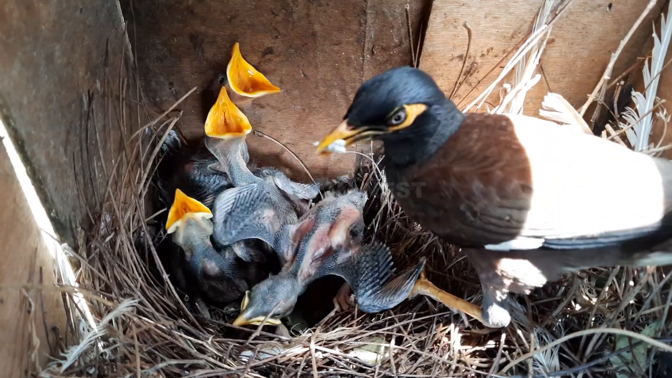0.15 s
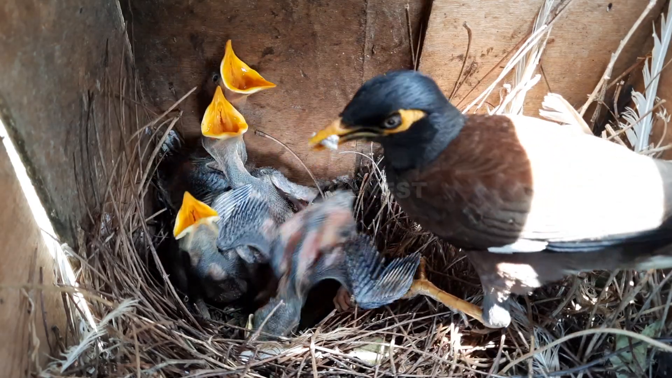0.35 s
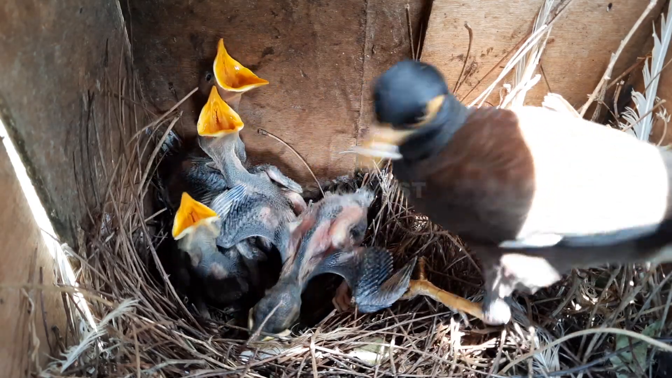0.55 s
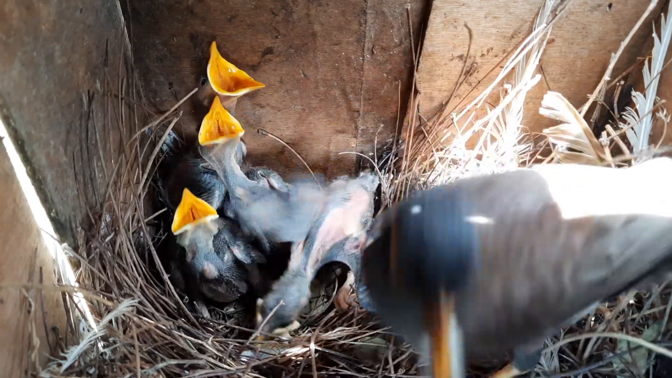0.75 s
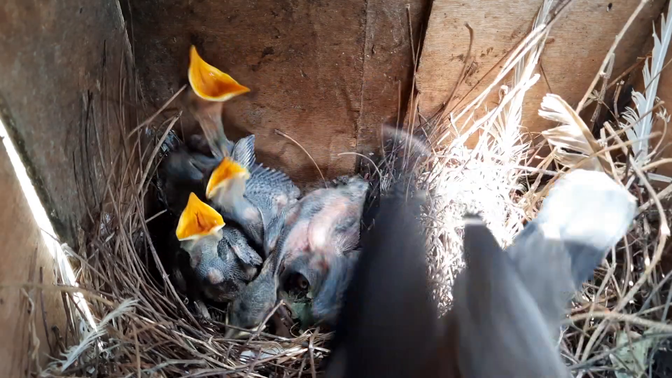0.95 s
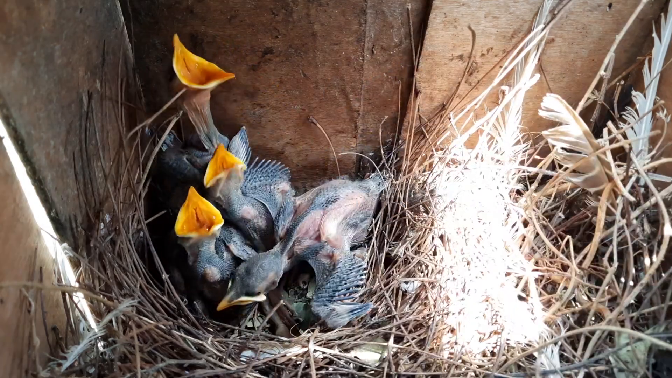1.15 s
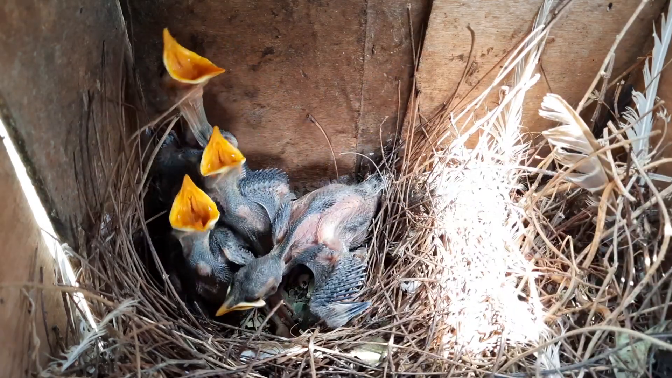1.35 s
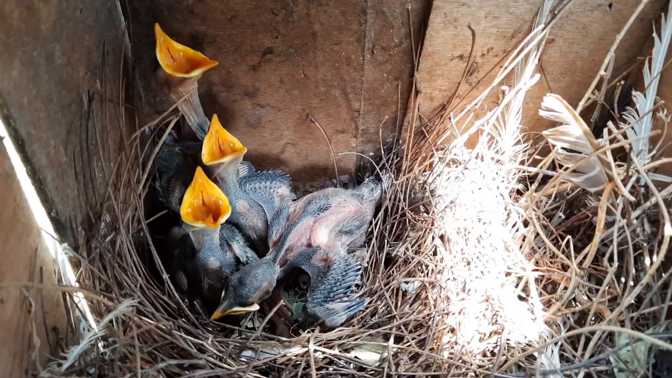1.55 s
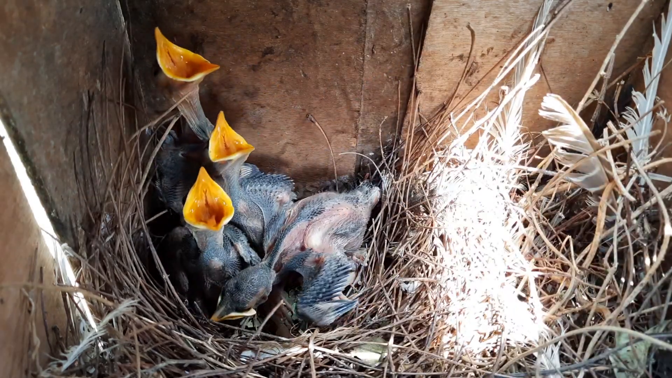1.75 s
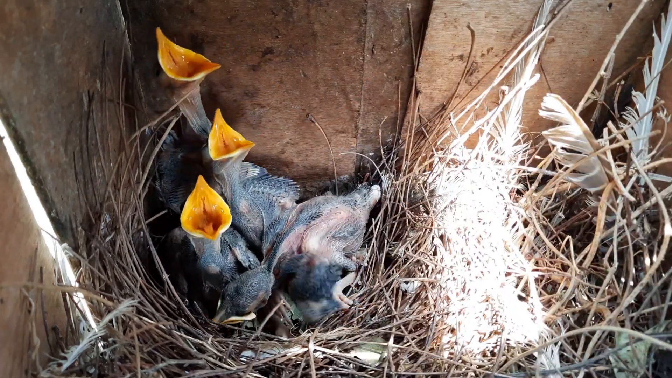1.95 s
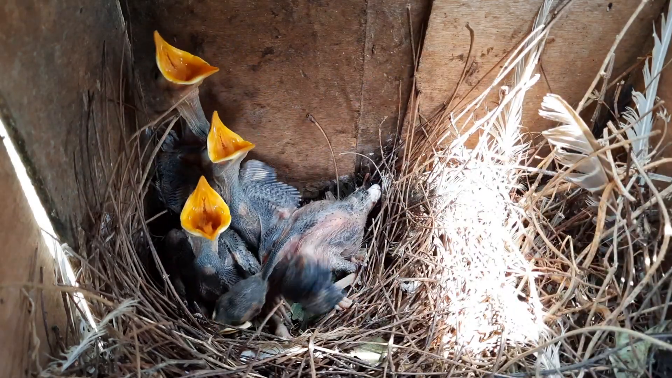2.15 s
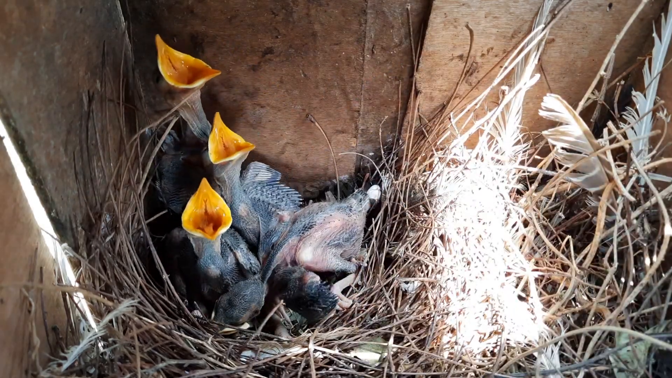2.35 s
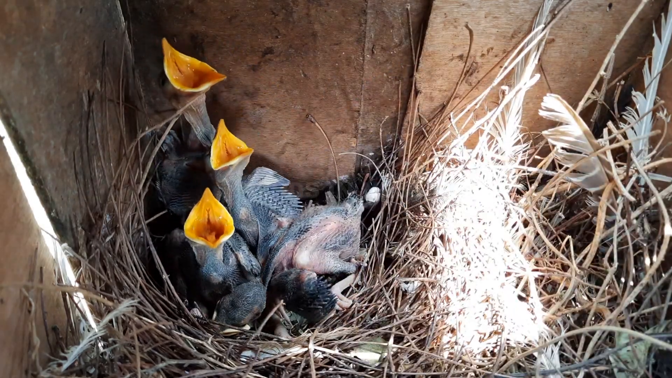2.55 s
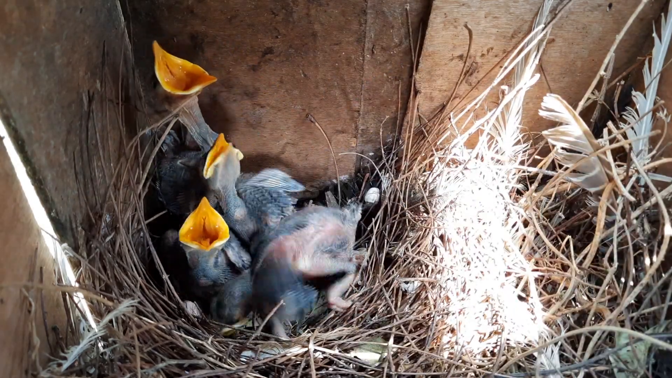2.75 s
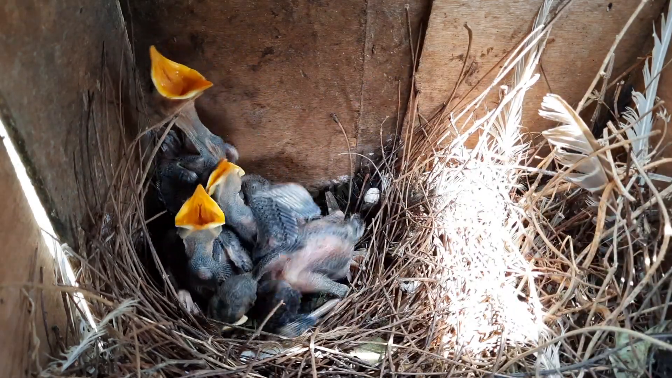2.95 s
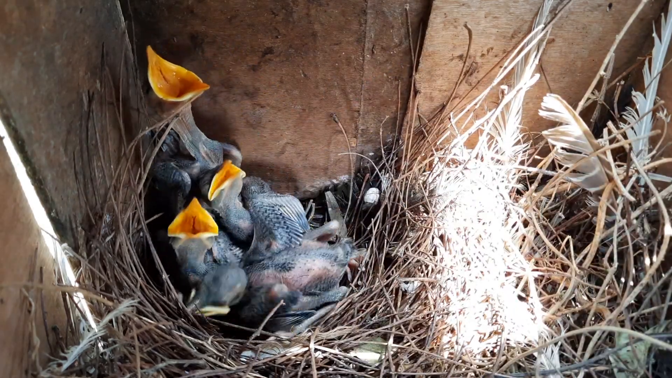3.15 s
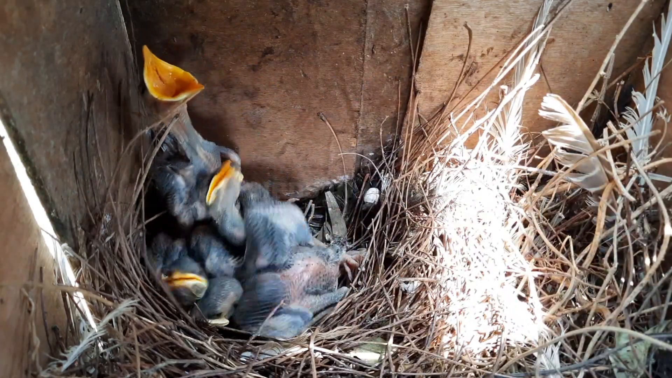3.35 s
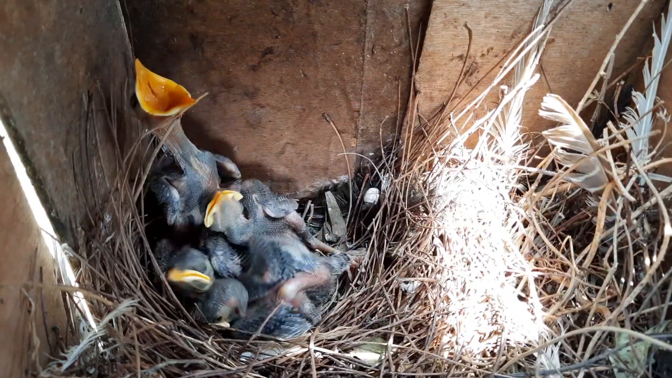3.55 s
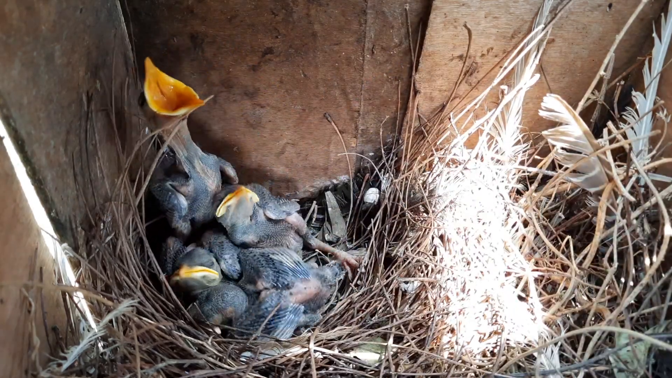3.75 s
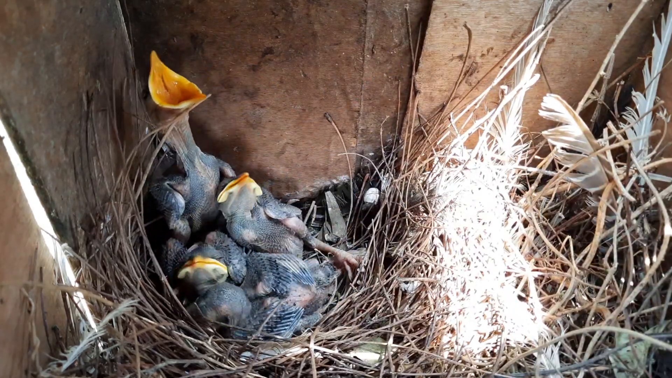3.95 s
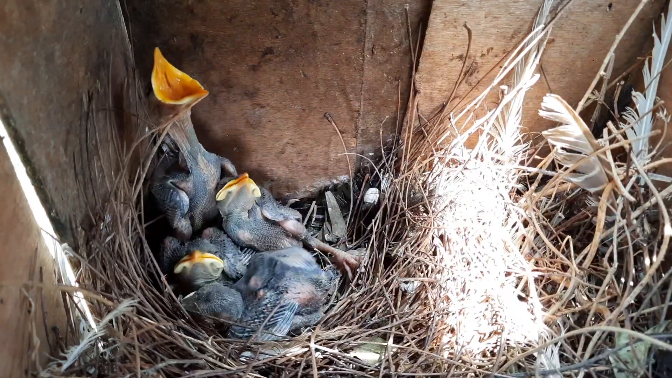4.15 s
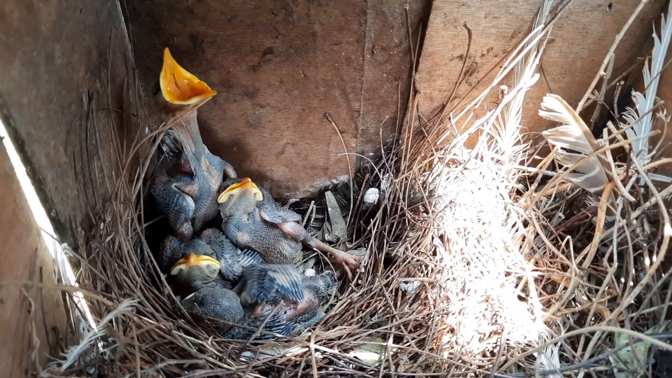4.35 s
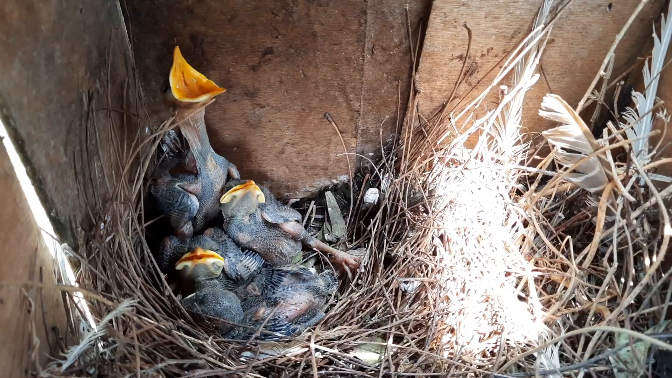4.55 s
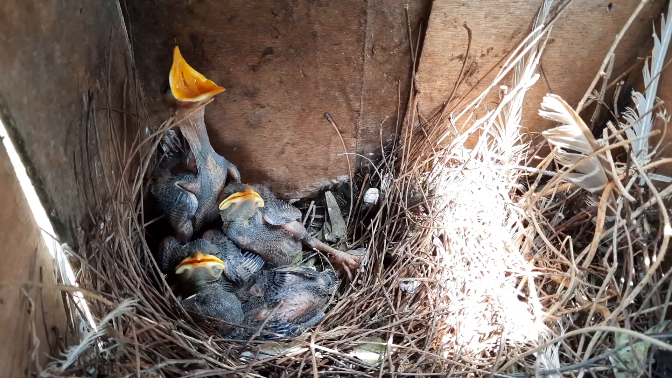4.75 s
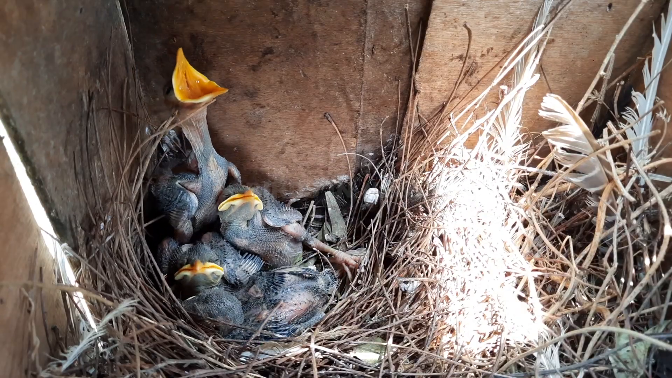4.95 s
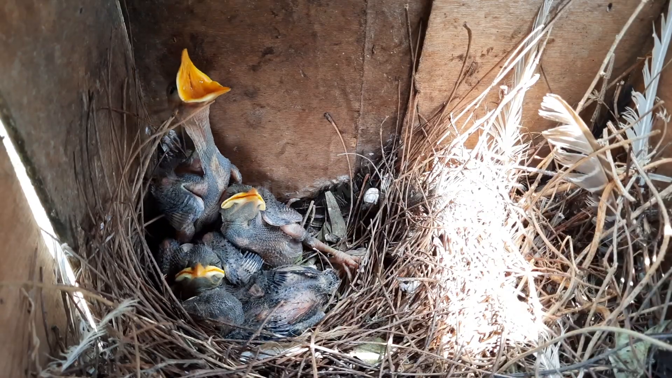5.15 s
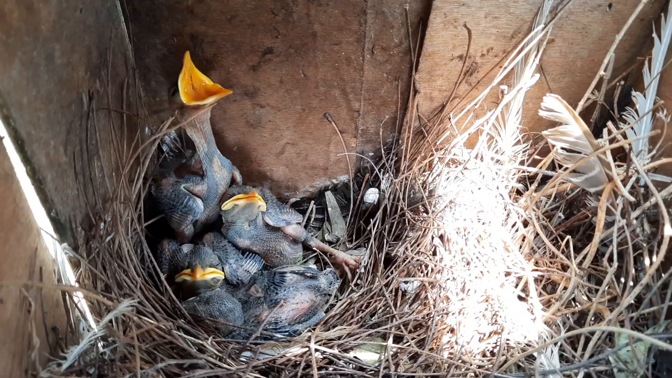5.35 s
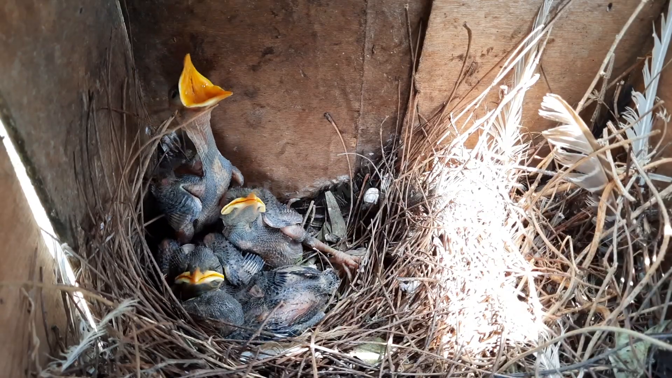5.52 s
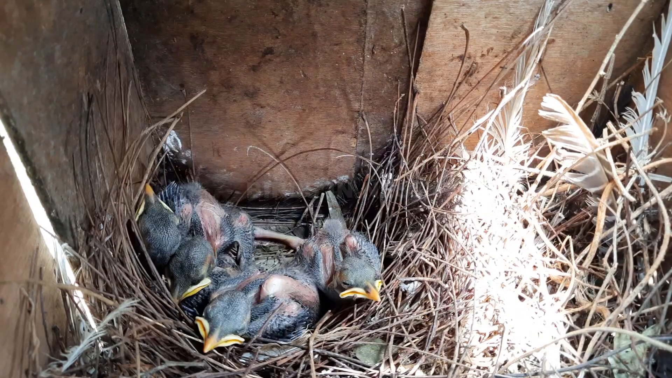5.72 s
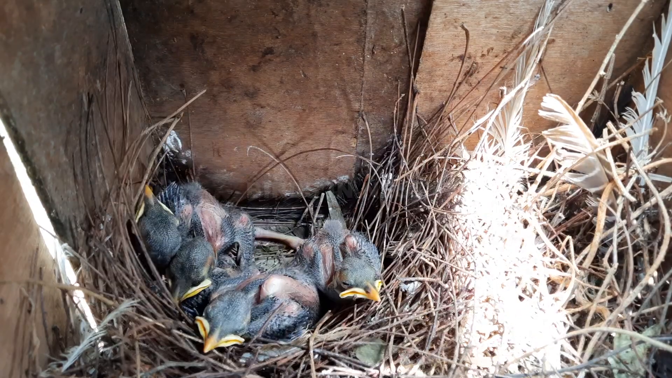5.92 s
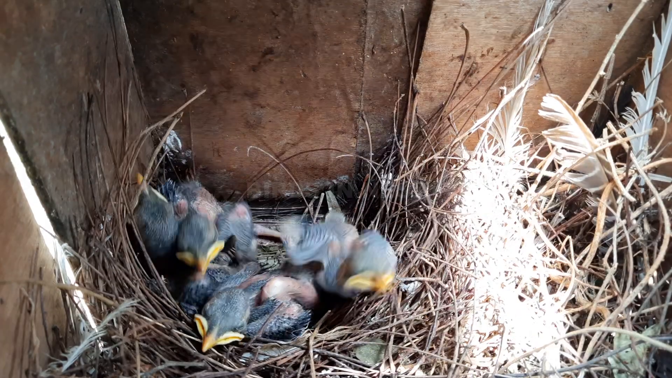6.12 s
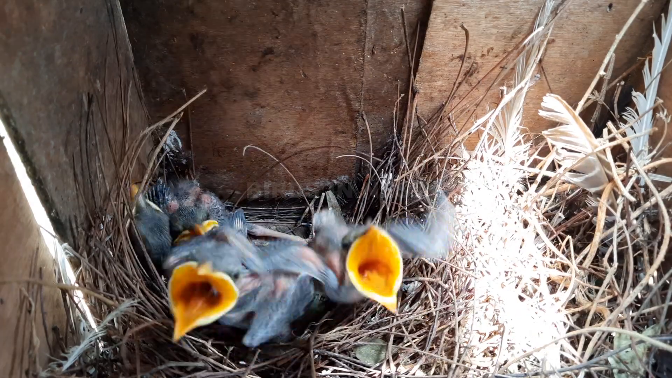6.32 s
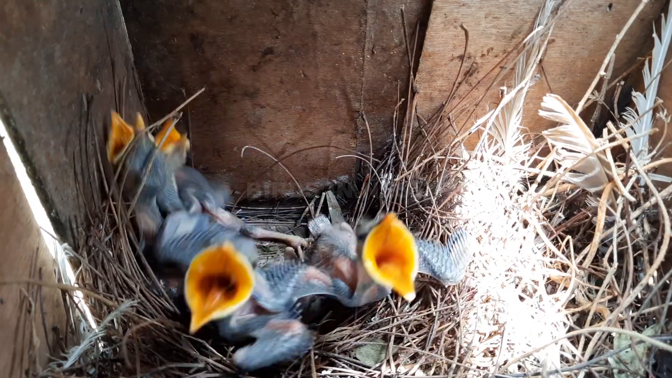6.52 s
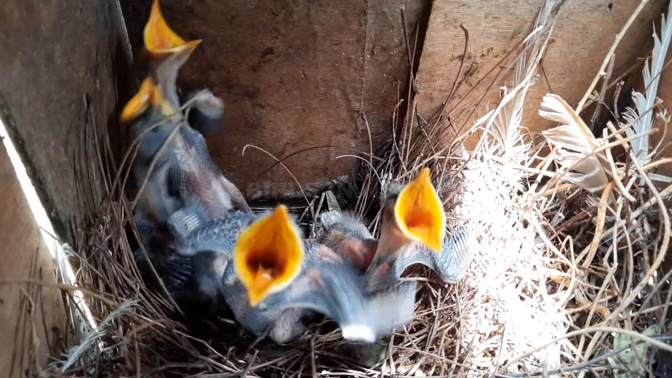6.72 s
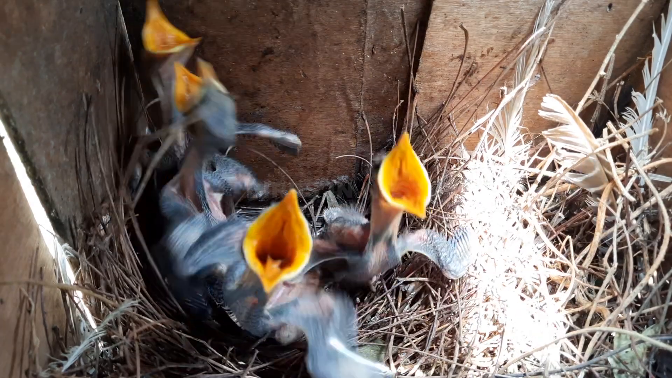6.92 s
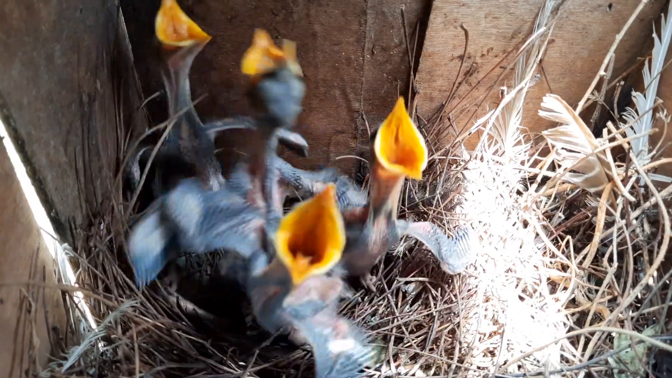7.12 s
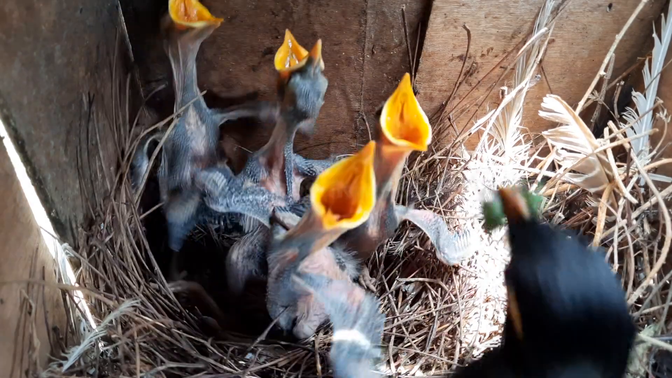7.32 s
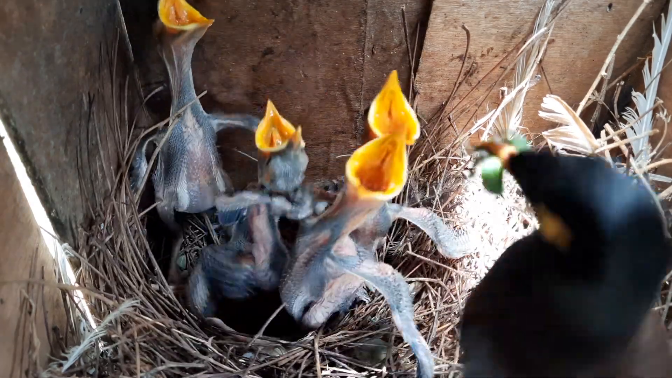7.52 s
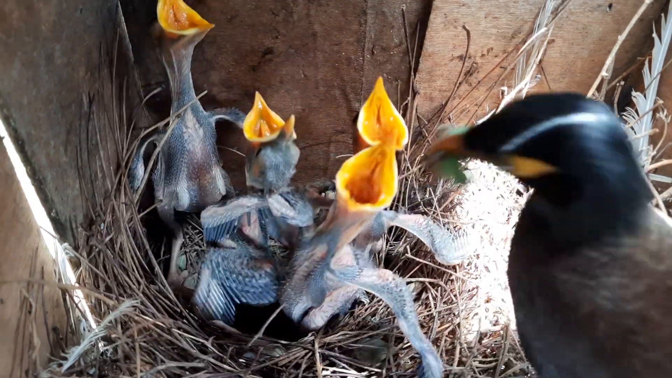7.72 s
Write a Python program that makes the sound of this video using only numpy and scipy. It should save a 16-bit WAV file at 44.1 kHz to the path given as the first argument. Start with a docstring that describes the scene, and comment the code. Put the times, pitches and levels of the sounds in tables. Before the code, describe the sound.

Heard from close up in a wooden nest box, a nestling calls in quick, high, warbling bursts with a harsh edge, and weaker chicks squeak around it. A few soft thumps of an adult bird hopping come early. The cries break off briefly past the middle, then return with more thumps, rustling twigs and small dry snaps. Far outside, insects hiss faintly and steadily.

```python
"""Nestlings begging in a wooden nest box

A small stereo microphone sits close to the brood. The loudest chick whistles a warbling cry that throbs
about ten times a second and turns harsh as a second, lower voice joins each throb; its nest mates add
short slides and peeps. The parent's hops thud on the boards, bodies shuffle in the twigs, a draught
brushes the microphone, and far outside an insect chorus hisses through the pauses."""
import sys
import numpy as np
from scipy import signal
from scipy.fft import rfft, irfft, next_fast_len
from scipy.io import wavfile
from scipy.ndimage import uniform_filter1d, map_coordinates

SR = 44100
rng = np.random.default_rng(int(sys.argv[2]) if len(sys.argv) > 2 else 0)


def put_to_file(sound):
    """Save the sound as 16-bit audio at rate SR, in the file named by the first command-line argument."""
    columns = np.atleast_2d(sound).T  # one column per channel
    safe = np.clip(columns, -1, 1)
    whole_steps = np.round(safe * 32767)
    wavfile.write(sys.argv[1], SR, whole_steps.astype(np.int16))


N = 347508
TIME = np.arange(N) / SR
SCRAMBLE_S, TURNED_DB = 6.0, -11  # from here the chicks scramble, beaks point away and overtones weaken


def amp(db):
    """Decibels to gain."""
    return 10 ** (np.asarray(db) / 20)


def unit(x):
    """x scaled to rms 1."""
    return x / np.sqrt(np.mean(x ** 2) + 1e-20)


def sides(db):
    """Gains that make the left channel db louder than the right."""
    return amp([[db / 2], [-db / 2]])


def wobble(rate):
    """A smooth random curve of rms 1, with rate knots a second."""
    return unit(map_coordinates(rng.standard_normal(int(N * rate / SR) + 4), [TIME * rate]))


def filtered(x, response):
    """x through a filter whose gain is response(hz)."""
    size = next_fast_len(N + SR // 4)
    return irfft(rfft(x, size) * response(np.fft.rfftfreq(size, 1 / SR)), size)[..., :N]


def rush(spectrum, mono_hz=400, patchy_db=4):
    """Stereo noise of rms 1, alike on both sides below mono_hz, with louder and softer patches."""
    def colour(hz):
        width = np.pi / 4 / (1 + (mono_hz / (hz + 1)) ** 2)
        return amp(np.interp(np.log(hz + 1), np.log(knots_hz), db)) * [np.cos(width), np.sin(width)]

    knots_hz, db = np.transpose(spectrum)
    cells = signal.stft(rng.standard_normal((2, N)), nperseg=256)[2]
    patches = rng.standard_normal(cells.shape[1:])
    patches = unit(uniform_filter1d(uniform_filter1d(patches, 5, axis=0), 7, axis=1))
    noise = signal.istft(cells * amp(patchy_db * patches), nperseg=256)[1][:, :N]
    mid, side = filtered(noise, colour)
    return unit(np.array([mid + side, mid - side]))


# Spectrum of the insects, far outside the box: (frequency [Hz], relative density [dB])
INSECT_SPECTRUM = [(2500, -31.5), (3600, -28.5), (4600, -6), (8300, -7.5), (9600, -28), (15500, -30.5)]


def insects(level_db=-48):
    """A distant chorus merges into one steady, high hiss."""
    return amp(level_db) * rush(INSECT_SPECTRUM, patchy_db=4.5)


def draught(level_db=-60):
    """Moving air buffets the microphone, mostly its right port, with a faint rumble."""
    gusts = amp(level_db + 2.5 * wobble(4))
    return gusts * sides(-13) * rush([(25, -26), (65, 0), (200, -30), (900, -90)], mono_hz=1)


# Spectrum of the nest rustling beside the microphone: (frequency [Hz], relative density [dB])
TWIG_SPECTRUM = [(60, -22.5), (110, 0.5), (200, -1), (400, -14.5), (1500, -15.5), (5000, -32.5),
                 (16000, -24.5)]


def twig_shuffle(still_db=-68, begging_db=10, stirred_db=-36, settle_s=0.15, scramble_db=-44):
    """Bodies shift in the twigs while the chick begs, after each hop and in the late scramble."""
    begging = uniform_filter1d(effort()[2], int(.08 * SR))
    stirred = sum(amp(db / 3 + stirred_db) * (TIME > s) * np.exp(-np.abs(TIME - s) / settle_s)
                  for s, db in HOPS)
    scramble = amp(scramble_db) * (TIME > SCRAMBLE_S)
    rustle = unit(amp(3 * wobble(25) + 3 * wobble(250)) * rush(TWIG_SPECTRUM))
    return (amp(still_db + begging_db * begging) + stirred + scramble) * rustle


# Short dry clicks: twig snaps close by, and one faint plain click at 5.58 s:
# (time [s], relative level [dB])
CLICKS = [(0.9964, -14.5), (5.5819, -27.5), (6.043, -23.5), (7.2025, -13.5), (7.352, -14)]


def dry_clicks(attack_s=0.00036, t60=0.057):
    """Each click is a fast-dying noise burst, strongest between 600 and 5000 Hz."""
    out, t = np.zeros((2, N + SR)), np.arange(SR // 20) / SR
    for s, db in CLICKS:
        envelope = amp(db - 60 * t / t60) * (1 - np.exp(-t / attack_s))
        out[:, round(s * SR):][:, :len(t)] += envelope * rng.standard_normal((2, len(t)))
    return filtered(out[:, :N], lambda hz: 1j * hz / (600 + 1j * hz) / (1 + 1j * hz / 5000))


# The parent's hops and bumps, left of the microphone: (time [s], relative level [dB])
HOPS = [(0.925, -17.5), (1.126, -13), (1.237, -14.5), (1.338, -12.5), (5.978, -15), (6.165, -27.5),
        (6.322, -25.5), (6.435, -30), (6.548, -38), (7.106, -24), (7.187, -21), (7.239, -23), (7.36, -28)]
# Modes of the box's boards: (frequency [Hz], relative level [dB])
BOARD_MODES = [(193.5, -1), (230, -4.5), (385, -7.5), (560, -1), (760, -10.5)]


def parent_hops(t60_cycles=10, attack_s=0.0027, scuffle_db=-26.5, scuffle_t60=0.32):
    """Each hop is a soft blow with a scuffle of weaker ones behind it; all ring the boards."""
    out, t = np.zeros((2, N + SR)), np.arange(SR // 4) / SR
    for s, db in HOPS:
        ring = np.zeros(len(t))
        for hz, mode_db in BOARD_MODES:
            decay = amp(mode_db + rng.normal(0, 2.64) - 60 * t * hz / t60_cycles)
            ring += decay * np.sin(2 * np.pi * hz * rng.normal(1, 0.037) * t)
        ring *= 1 - np.exp(-t / attack_s)
        scuffle = amp(scuffle_db - 60 * t / scuffle_t60) * rng.standard_normal(len(t))
        thud = ring + signal.fftconvolve(scuffle, ring)[:len(t)]
        out[:, round(s * SR):][:, :len(t)] += amp(db) * thud
    return sides(10.2) * out[:, :N]


def box_walls(x, wet_db=-13, t60=.03):
    """Close wooden walls add a short, dense tail, different in each channel."""
    t = np.arange(SR // 16) / SR
    tail = rng.standard_normal((2, len(t))) * amp(-60 * t / t60) * (t > .0008)
    tail = amp(wet_db) * tail / np.linalg.norm(tail, axis=1, keepdims=True)
    return x + signal.fftconvolve(x, tail, axes=1)[:, :N]


def peeps(centre_hz=5100, below_db=-19, linger_s=.12):
    """A weaker chick joins in around the loud one's cries: short, wandering squeaks with an octave."""
    db, _, crying = effort()
    phase = 2 * np.pi * np.cumsum(centre_hz * (1 + .11 * wobble(25))) / SR
    bursts = np.clip(wobble(30), 0, 1) * uniform_filter1d(crying, int(linger_s * SR)) ** 2
    return amp(below_db + db) * bursts * (np.sin(phase) + .5 * np.sin(2 * phase))


# Slides of the nest mates, around the loud chick:
# (start [s], length [s], relative level [dB], first pitch [Hz], turning pitch [Hz], last pitch [Hz])
SLIDES = [(0.345, 0.079, -30, 6090, 6600, 5440), (0.475, .045, -36, 5300, 5700, 6000),
          (1.076, 0.1, -35, 5430, 5500, 6300), (1.137, 0.07, -25.5, 4880, 4830, 4140),
          (1.777, 0.1, -35.5, 5770, 4840, 6800), (1.887, 0.087, -40.5, 5450, 4130, 4550),
          (2.289, 0.068, -24.5, 4700, 5460, 4080), (2.516, 0.095, -34.5, 5560, 4250, 5930),
          (2.972, 0.15, -37.5, 5500, 4490, 4210), (3.095, 0.088, -38, 5900, 5200, 6240),
          (3.817, 0.081, -45.5, 4600, 5310, 5590), (4.253, 0.056, -38.5, 3300, 3650, 3280),
          (4.307, 0.088, -34.5, 5080, 6040, 5960), (5.069, 0.076, -40, 4030, 4460, 4380),
          (5.163, 0.13, -44.5, 4400, 4550, 4270), (5.173, 0.13, -48.5, 5950, 6050, 5730),
          (6.358, 0.093, -27.5, 6450, 5006, 4780), (6.484, 0.049, -26, 5930, 4740, 4710),
          (6.579, 0.038, -35, 5900, 4840, 4470), (6.771, 0.062, -30, 4210, 4770, 4360),
          (7.301, 0.16, -25.5, 4900, 4750, 5030), (7.374, .037, -27.5, 6550, 6550, 6620),
          (7.436, 0.098, -23.5, 5400, 5930, 6510), (7.527, 0.14, -28, 5080, 5460, 6620),
          (7.605, 0.16, -30.5, 4950, 4750, 5760), (7.782, 0.11, -22, 4880, 5010, 6100)]
# Breath in any chick's open throat, at close range: (frequency [Hz], relative density [dB])
BREATH_SPECTRUM = [(600, -39.5), (1050, -28.5), (1500, -40.5), (2300, -22), (3500, -20.5), (4500, -15),
                   (6500, -22.5), (8500, -9.5), (10000, -31), (13000, -24), (16000, -40)]


def nest_mates(octave_db=-8, breath_db=-13, edge_s=0.0081, turn_share=.4):
    """Thin whistled slides with breath and an octave that the throat damps on high notes, plus peeps."""
    tone, octave, level = np.zeros((3, N))
    shiver_hz = 35 * wobble(350) + 80 * wobble(60)
    for start, length, db, *hz in SLIDES:
        part = slice(round(start * SR), round((start + length) * SR))
        t = TIME[part] - start
        pitch = np.interp(t, [0, turn_share * length, length], hz)
        pitch = uniform_filter1d(pitch, int(edge_s * SR), mode="nearest")
        phase = 2 * np.pi * np.cumsum(pitch + shiver_hz[part]) / SR
        envelope = amp(db) * np.clip(np.minimum(t, length - t) / edge_s, 0, 1) ** 2
        tone[part] += envelope * np.sin(phase)
        octave[part] += envelope * np.sin(2 * phase)
        level[part] += envelope
    octave = filtered(octave, lambda hz: 1 / (1 + (hz / 9500) ** 10))
    voice = np.sqrt(2) * (tone + amp(octave_db + TURNED_DB * (TIME > SCRAMBLE_S)) * octave)
    hoarse = 1 + .4 * np.array([wobble(1200), wobble(1200)])
    flutter = amp(2.8 * wobble(80))
    return flutter * (hoarse * (voice + peeps()) + amp(breath_db) * level * rush(BREATH_SPECTRUM))


# Cries of the loud chick, close to the microphone: (start [s], end [s])
CRY_SPANS = [(0.072, 0.66), (0.782, 1.161), (1.214, 1.75), (1.97, 2.506), (2.66, 3.606), (3.892, 4.271),
             (4.592, 5.067), (5.422, 5.604), (6.345, 6.413), (6.477, 6.607), (6.891, 7.3), (7.463, 7.82)]
# Its throbs of effort; in each the pitch scoops up to a top, then sags:
# (time of top [s], relative level [dB], scoop pitch [Hz], top pitch [Hz], sag pitch [Hz])
CRY_THROBS = [(0.155, -12, 6315, 7120, 6780), (0.265, -14.5, 6320, 6820, 6470),
              (0.343, -12, 6440, 7060, 6550), (0.486, -14.5, 6270, 7000, 5920),
              (0.613, -18, 5840, 6500, 5780), (0.852, -10, 6440, 6950, 6840),
              (0.974, -12.5, 6380, 6630, 5900), (1.078, -9.5, 6520, 6530, 6280),
              (1.296, -18.5, 6680, 7000, 6490), (1.42, -19, 6230, 7210, 6660),
              (1.497, -11, 6610, 7050, 6760), (1.599, -13, 6700, 6870, 6000),
              (1.699, -13.5, 6380, 6720, 5430), (2.029, -14, 6350, 7000, 6600),
              (2.125, -14.5, 6500, 6820, 6500), (2.175, -17.5, 6530, 6965, 6290),
              (2.231, -14, 6300, 6600, 6000), (2.3, -15, 6020, 7100, 6120), (2.424, -18, 5250, 6490, 5660),
              (2.73, -14.5, 6410, 7150, 6730), (2.831, -15, 6590, 6930, 6280),
              (2.937, -11, 6230, 6566, 6220), (3.046, -19.5, 6160, 6690, 6650),
              (3.194, -18, 6290, 6830, 6680), (3.365, -10, 6570, 6940, 6880),
              (3.481, -14, 6400, 6770, 5980), (3.587, -11, 6040, 6420, 5400),
              (3.968, -12.5, 6480, 7050, 6750), (4.079, -12, 6420, 6790, 5990),
              (4.187, -14.5, 6180, 6520, 6150), (4.672, -13, 6370, 6970, 6800),
              (4.776, -14, 6390, 6790, 6180), (4.885, -15, 5920, 6580, 5240),
              (4.989, -20, 4910, 5710, 4220), (5.486, -11, 6410, 6900, 6680),
              (6.399, -15, 6680, 7130, 6250), (6.509, -9.5, 6150, 7040, 5600),
              (6.568, -26.5, 5900, 6930, 6480), (6.959, -8.5, 6650, 7340, 6370),
              (7.061, -13.5, 6920, 7130, 5920), (7.163, -12, 6580, 7140, 5990),
              (7.258, -15, 6540, 7170, 6220), (7.521, -11, 6250, 7430, 6650),
              (7.624, -11.5, 6576, 7170, 6500), (7.72, -9, 6470, 7000, 6440),
              (7.8, -15.5, 6450, 6860, 6640)]


def effort(lead_s=0.01, width_s=0.029, edge_s=0.011):
    """The loud chick's level [dB], its slackness between throbs (0-1) and whether it is crying (0-1)."""
    top_s, db = np.transpose(CRY_THROBS)[:2]
    push_s = top_s - lead_s  # loudest just before the pitch tops out
    nearest = np.rint(np.interp(TIME, push_s, np.arange(len(push_s)))).astype(int)
    slack = 1 - np.exp(-.5 * ((TIME - push_s[nearest]) / width_s) ** 2)
    crying = sum(np.clip(np.minimum(TIME - start, end - TIME) / edge_s, 0, 1) ** 2
                 for start, end in CRY_SPANS)
    return np.interp(TIME, push_s, db), slack, crying


def warble(opening_hz=7340, scoop_s=.035, sag_s=.028, flick_s=.055, flick_hz=531.6, slump_hz=5635,
           close_hz_per_s=15000):
    """Turning points (time [s], pitch [Hz]) of the whistle: each cry drops in, throbs and falls away."""
    points = []
    for start, end in CRY_SPANS:
        throbs = [row for row in CRY_THROBS if start < row[0] < end]
        following = throbs[1:] + [(np.inf, 0, throbs[-1][-1])]
        points.append((start, opening_hz))
        for (s, _, scoop, top, sag), (next_s, _, next_scoop, *_) in zip(throbs, following):
            # the pitch flicks up between throbs, unless it has slumped or the next one comes too soon
            flicks = sag > slump_hz and next_s - s > flick_s + scoop_s
            link_s = min(s + flick_s, (s + sag_s + next_s - scoop_s) / 2)
            link_hz = (sag + next_scoop) / 2 + flick_hz * flicks
            turns = [(s - scoop_s, scoop), (s, top), (s + sag_s, sag), (link_s, link_hz)]
            points += [turn for turn in turns if turn[0] < end]
        last_s, last_hz = points[-1]
        points.append((end, last_hz - close_hz_per_s * min(end - last_s, flick_s)))
    return np.array(sorted(points))


def phase_of(points, jitter_hz):
    """Running phase of a pitch that swings from one turning point to the next and shivers."""
    s, hz = np.transpose(points)
    place = np.interp(TIME, s, np.arange(len(s)))
    k = np.minimum(place.astype(int), len(s) - 2)
    pitch = hz[k] + (hz[k + 1] - hz[k]) * np.sin(np.pi / 2 * (place - k)) ** 2
    return 2 * np.pi * np.cumsum(pitch + jitter_hz * wobble(350)) / SR


def throat_air(whistle_level, db, linger_s=0.037):
    """Turbulent air in the open throat comes in puffs, lingers and reaches the left port first."""
    flow = uniform_filter1d(whistle_level, int(linger_s * SR))
    left, right = rush(BREATH_SPECTRUM, mono_hz=7740)
    return amp(db + 2 * wobble(60)) * flow * [left, np.roll(right, 7)]


# The loud chick's two voices and their mixed tones:
# (multiple of the whistle [-], multiple of the low voice [-], relative level [dB])
CRY_PARTIALS = [(1, -1, -24.5), (0, 1, -1), (1, 0, -3), (0, 2, -9.5), (1, 1, -15.5), (0, 3, -14.5)]


def loud_chick(whistle_dip_db=11, harsh_db=-12, harsh_growth=0.76, harsh_dip_db=85, breath_db=-15,
               low_ratio=.655, low_follows=.4, low_delay_s=0.006, pure_db=-27, pure_s=0.077):
    """A whistle; at each throb a flatter low voice joins in and the two mix into a harsh stack."""
    phase = phase_of(warble(), jitter_hz=55)
    tops_phase = phase_of(np.array(CRY_THROBS)[:, [0, 3]], jitter_hz=59.4)
    low_phase = low_ratio * (low_follows * phase + (1 - low_follows) * tops_phase)
    # short cries are purer: less harshness and less breath
    short_db = sum(pure_db * np.exp((start - end) / pure_s) * (TIME > start) * (TIME < end)
                   for start, end in CRY_SPANS)
    db, slack, crying = effort()
    whistle = crying * amp(db - whistle_dip_db * slack + 2.4 * wobble(110))
    low_slack = np.roll(slack, int(low_delay_s * SR))
    harsh = crying * amp(harsh_db + short_db + harsh_growth * db - harsh_dip_db * low_slack ** 2)
    uneven = 1 + .22 * np.array([wobble(1500), wobble(1500)])  # uneven cycles smear every partial
    voice = 0
    for high, low, partial_db in CRY_PARTIALS:
        # the head moves: each channel gets its own swell, and the path difference between them drifts
        swell = amp(3.23 * np.array([wobble(60), wobble(60)]))
        drift = [[.5], [-.5]] * (1.99 * wobble(14))
        turned_db = TURNED_DB * (TIME > SCRAMBLE_S) * (high + low > 1)
        level = amp(partial_db + turned_db) * (harsh if low else whistle) * uneven * swell
        voice += sides(2.1 * high) * level * np.sin(high * phase + low * low_phase + drift)
    return voice + throat_air(whistle, breath_db + short_db)


def scene():
    """Inside the box: the chicks between close walls, over knocks, rustle and the air outside."""
    chicks = box_walls(loud_chick() + nest_mates())
    return chicks + parent_hops() + dry_clicks() + twig_shuffle() + draught() + insects()


def record(dry):
    """The small microphone rounds off the loudest peaks and passes nothing above 16 kHz."""
    return filtered(np.tanh(dry), lambda hz: hz < 16000)


dry = scene()
out = record(dry)
put_to_file(out)
```